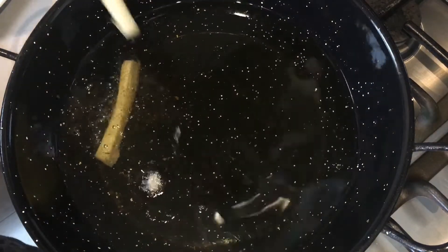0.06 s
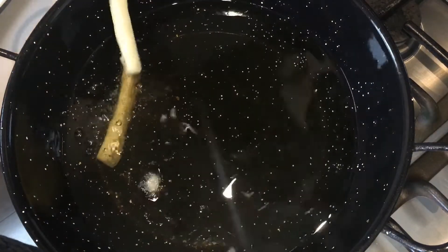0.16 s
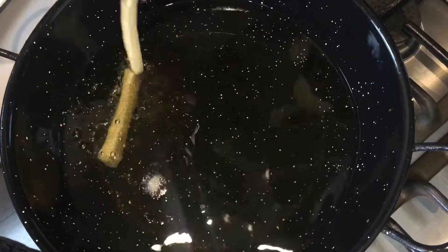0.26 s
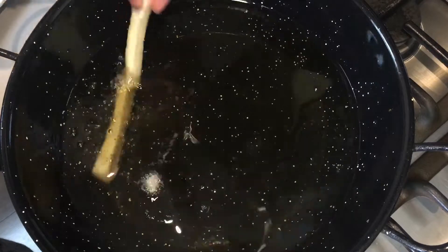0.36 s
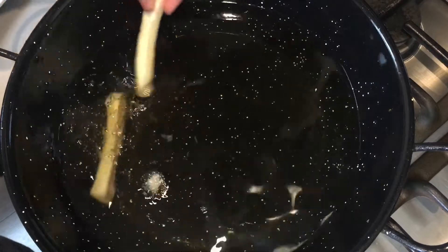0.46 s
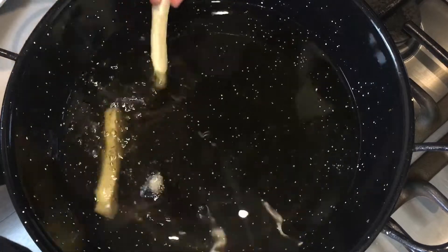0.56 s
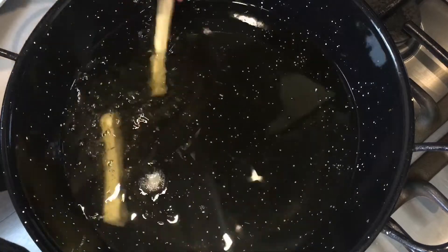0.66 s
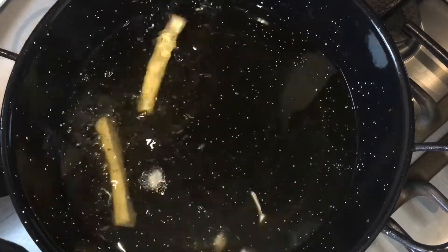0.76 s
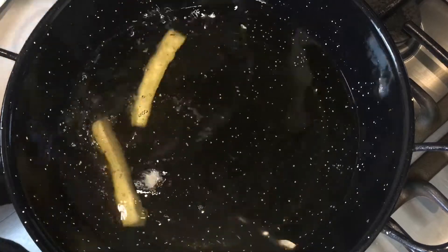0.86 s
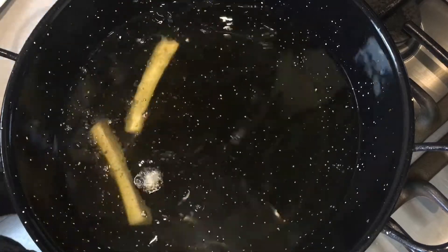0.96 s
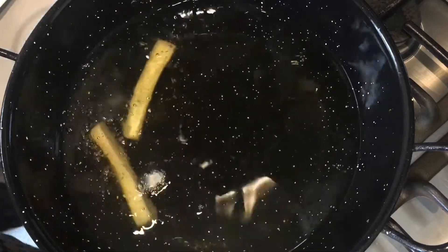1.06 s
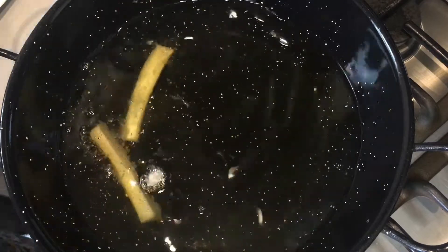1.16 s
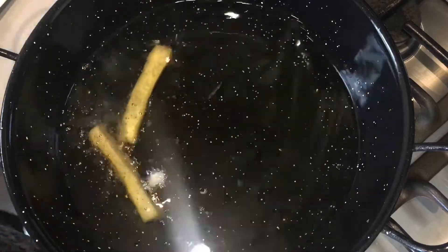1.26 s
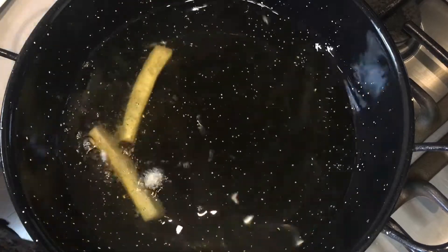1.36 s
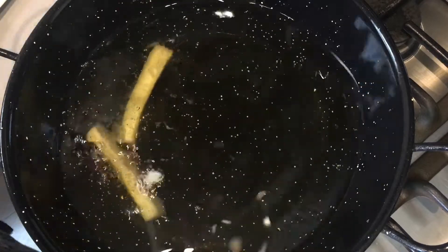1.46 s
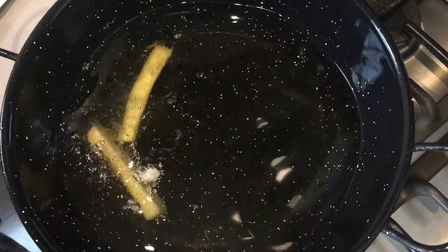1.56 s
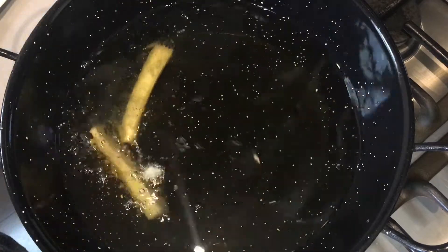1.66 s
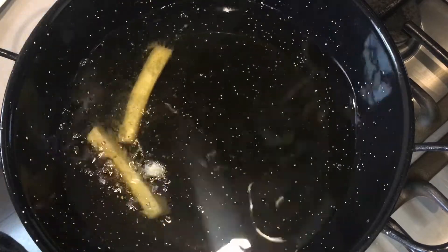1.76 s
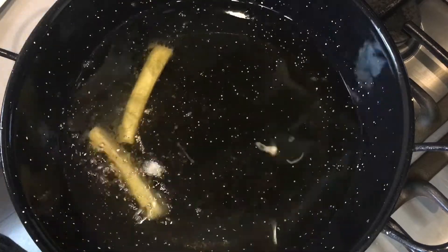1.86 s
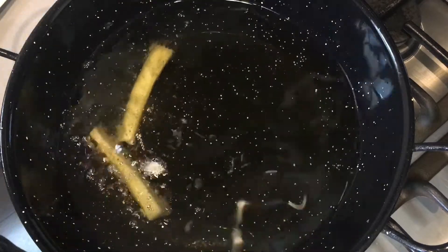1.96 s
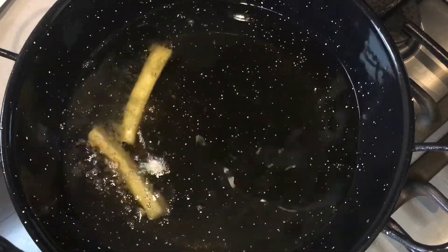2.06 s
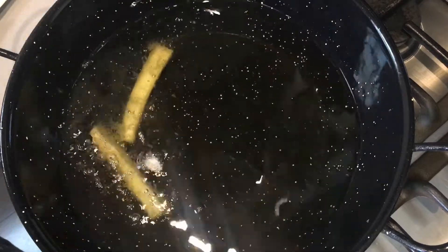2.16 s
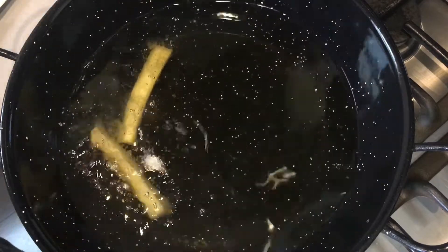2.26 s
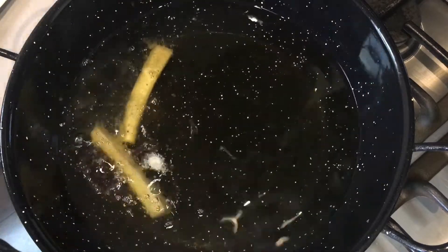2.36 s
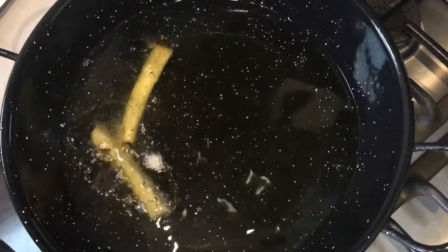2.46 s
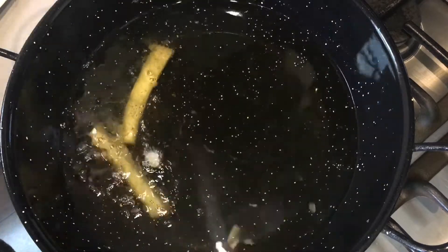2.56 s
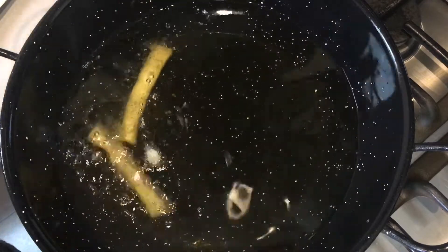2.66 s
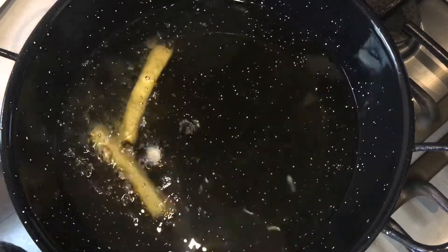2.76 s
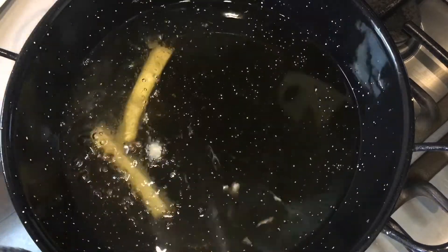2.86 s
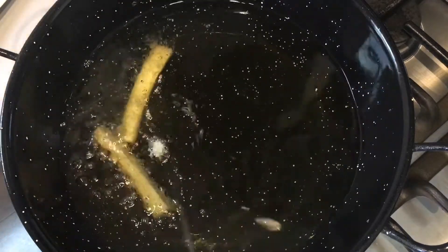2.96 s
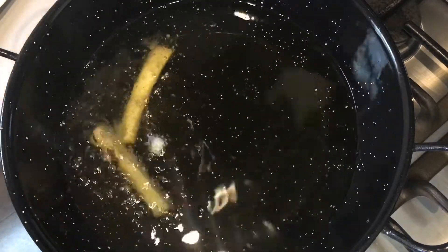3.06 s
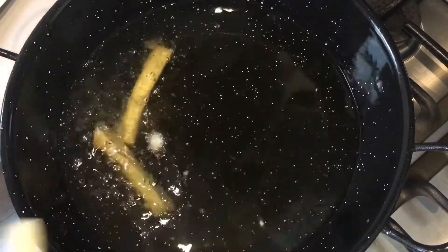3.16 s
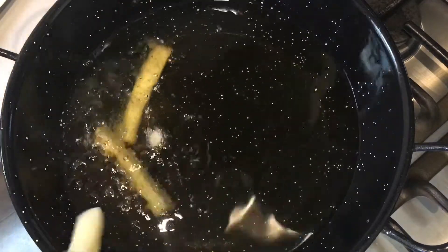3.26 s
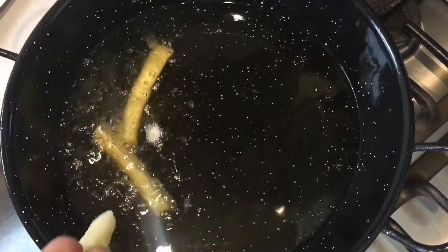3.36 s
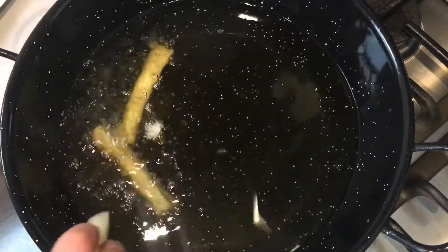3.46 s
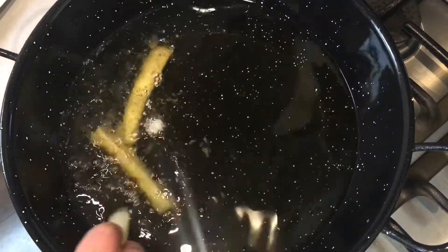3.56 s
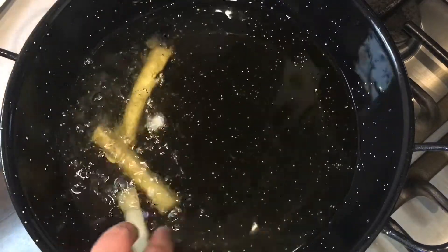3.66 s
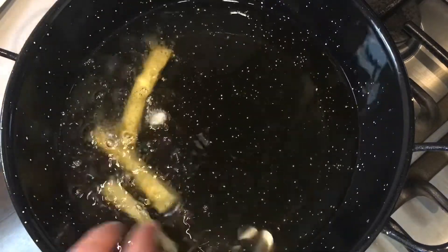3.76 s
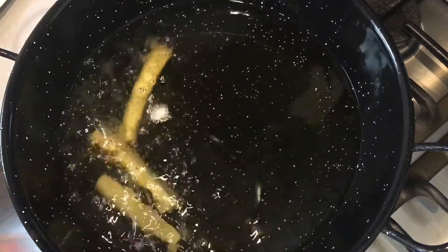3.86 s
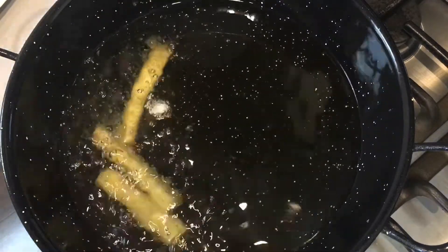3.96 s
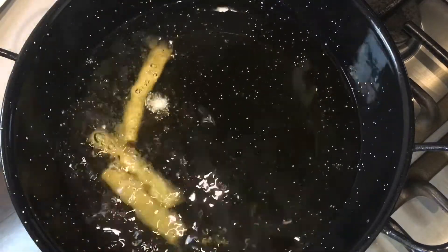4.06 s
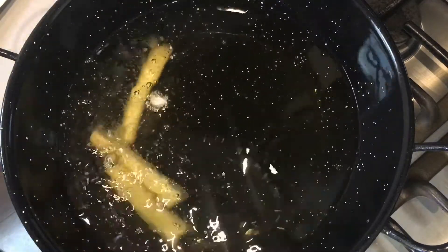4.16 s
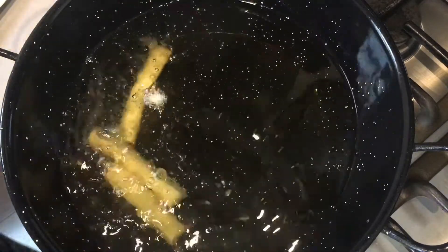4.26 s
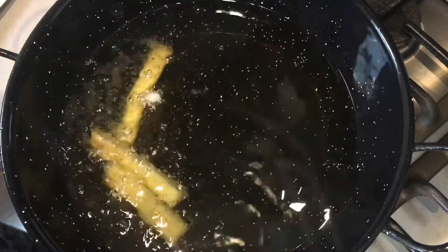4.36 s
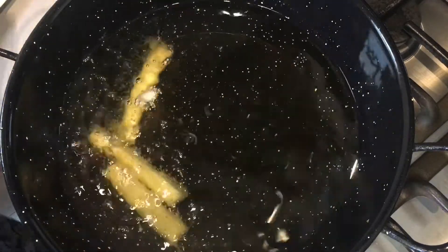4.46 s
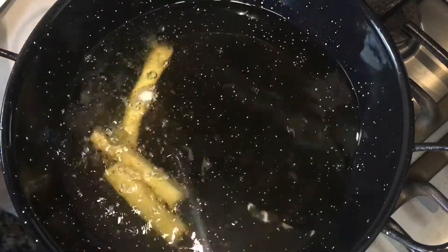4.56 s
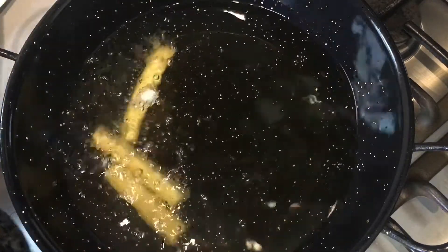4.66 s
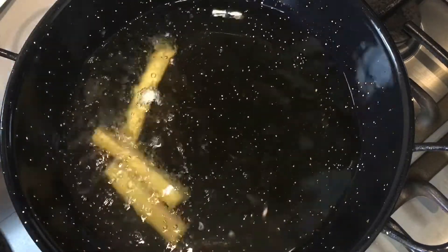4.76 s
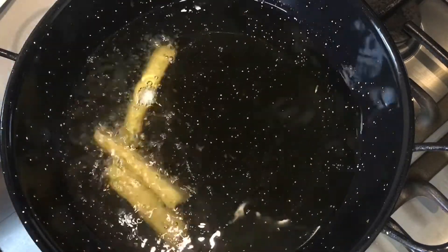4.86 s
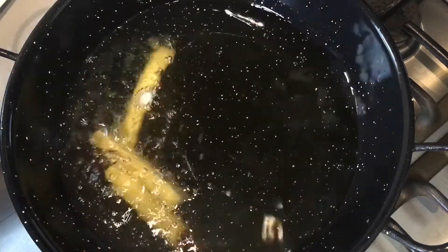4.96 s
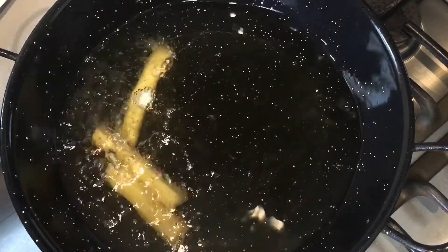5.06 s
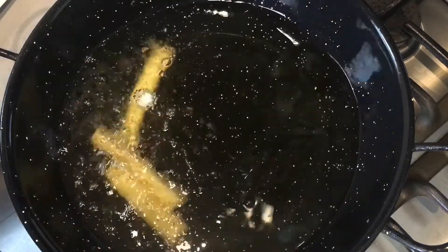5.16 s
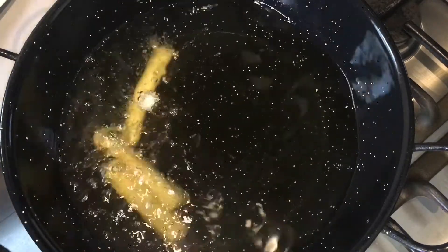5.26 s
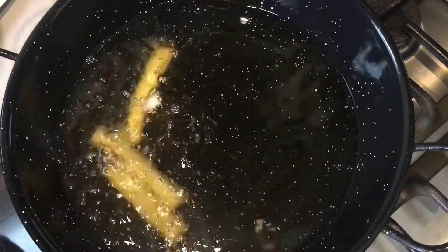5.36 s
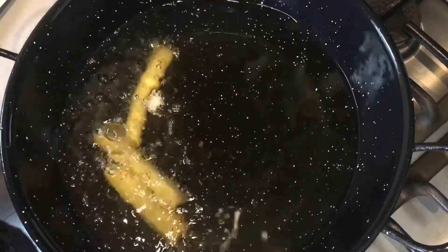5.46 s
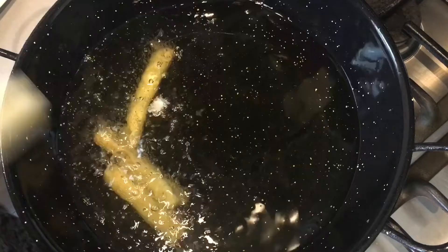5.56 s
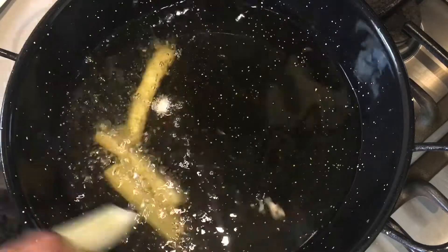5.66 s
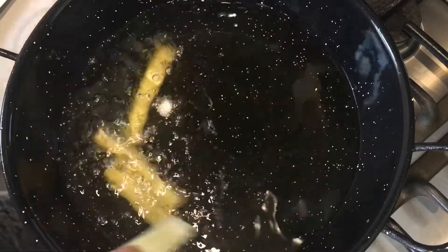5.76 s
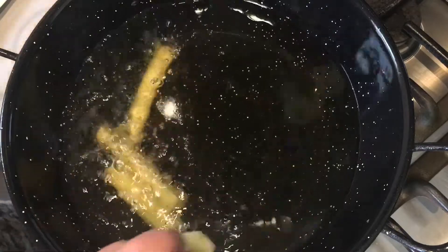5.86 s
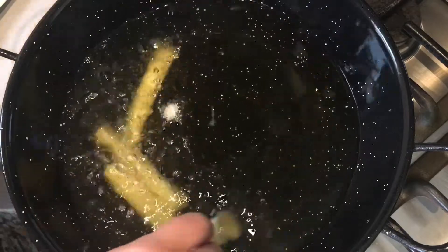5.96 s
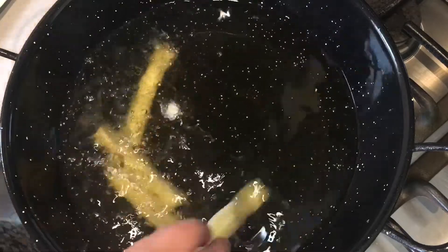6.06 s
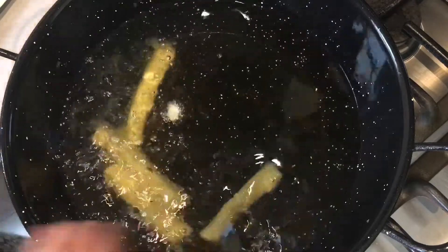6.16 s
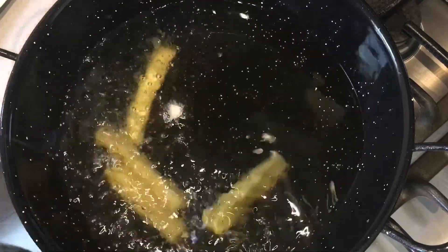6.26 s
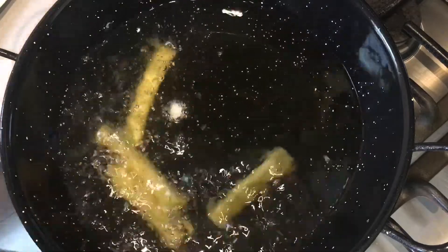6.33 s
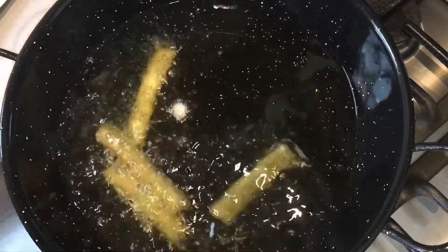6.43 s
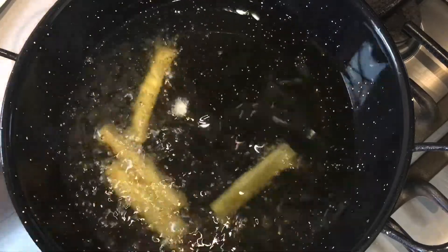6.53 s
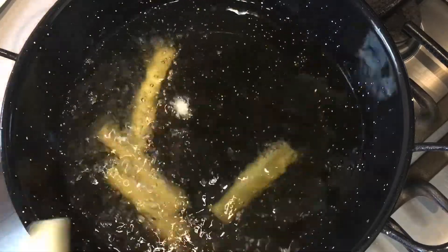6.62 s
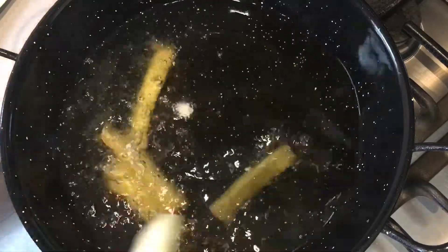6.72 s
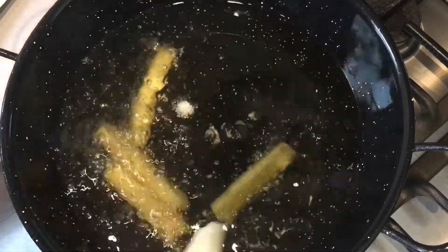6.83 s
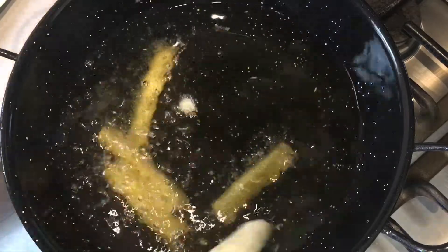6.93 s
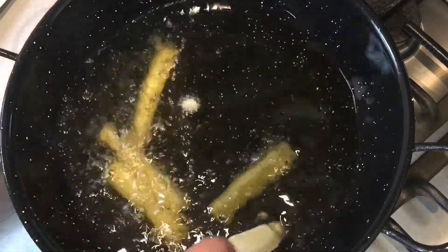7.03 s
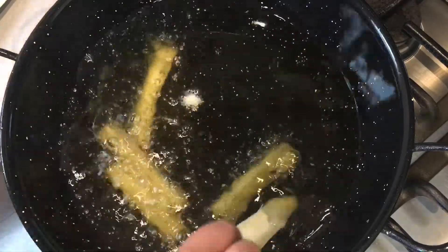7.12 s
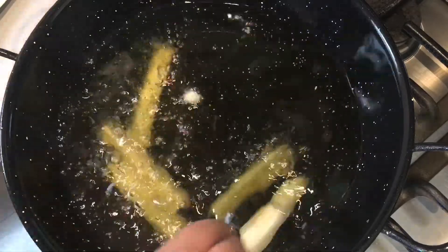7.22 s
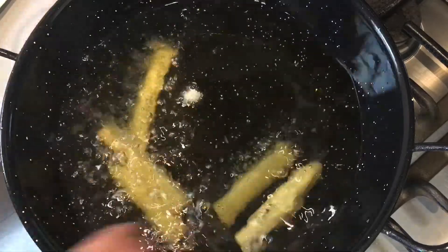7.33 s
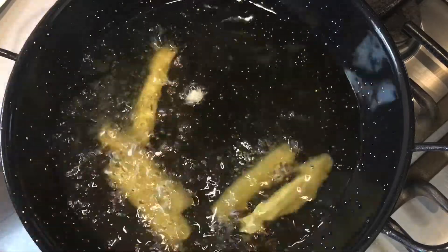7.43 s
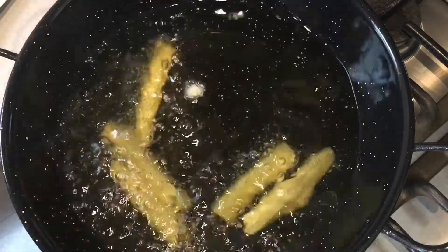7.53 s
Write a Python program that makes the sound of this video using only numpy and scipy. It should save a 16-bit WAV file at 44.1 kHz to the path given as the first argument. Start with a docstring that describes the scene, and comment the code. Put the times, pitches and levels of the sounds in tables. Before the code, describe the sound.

A close, mono kitchen sound: an enamelled pan of hot oil on a gas ring. Throughout, the burner hisses steadily with a slight flutter, over a low mains hum and deep drone. At first there is almost only this, with small ticks from 0.4 s. At 0.8 s a chip enters with a sharp pop and short fizz, repeated lightly at 1.0 s. A thin simmer follows with sparse crackles and a soft gulp near 2.3 s. At 3.8 s another wet chip sets off a bright, dense spitting flare, fading by 4.2 s to faint simmering and occasional ticks. At 6.05 s the loudest frying begins: splashy sizzle, bubbling plops and hard pops rattling around the pan, strongest around 6.45, 6.7 and 7.0 s. At 7.2 s one more chip renews the sizzle, still crackling at the end, 7.6 s.

```python
"""A kitchen, close over an enamelled pan on a gas ring: potato chips go one by one into hot oil, in mono.
Water on each wet chip flashes to steam, heard as swarms of tiny bubbles: clicks ringing in narrow bands.
Bigger drops pop and rattle round the pan, large bubbles plop and the oil gulps: shaped bursts of noise.
The burner hisses steadily underneath as noise through resonances; an appliance hums on two sines and a drone."""
import sys
import numpy as np
from scipy import signal
from scipy.fft import rfft, irfft, next_fast_len
from scipy.io import wavfile
from scipy.ndimage import uniform_filter1d

SR = 44100
rng = np.random.default_rng(int(sys.argv[2]) if len(sys.argv) > 2 else 0)


def dump_mix(stems):
    """Bounce the given channels to the path in sys.argv[1] as a 16-bit WAV at rate SR."""
    frames = np.atleast_2d(stems).T  # one column per channel
    limited = np.clip(frames, -1, 1)  # hard clip at full scale
    pcm = np.round(limited * 32767).astype(np.int16)
    wavfile.write(sys.argv[1], SR, pcm)


N = 334719
TIME = np.arange(N) / SR

# resonances of the gas jet, burner and the gap under the pan: f/Hz, half width/Hz, relative level/dB
BURNER_RESONANCES = [(190, 50, -34), (274, 310, -10), (721, 102, -1.5), (891, 86, 1), (1115, 59, 0),
                     (1396, 116, -3), (1853, 30, -13.5), (2197, 120, -6), (2730, 580, -17.5),
                     (3200, 186, -8), (3850, 184, -6.5), (4590, 216, -8), (5500, 620, -13),
                     (5997, 110, 0.6), (6590, 270, -10.5), (8050, 137, -6), (8980, 400, -15),
                     (10700, 1380, -12.5), (11550, 200, -14), (12750, 410, -16.5), (13840, 1030, -12.5),
                     (15630, 270, -42)]
# mains hum: f/Hz, rms level/dB
MAINS_HUM = [(100, -45.5), (200, -73.5)]
# low drone of the room: f/Hz, half width/Hz, relative level/dB
DRONE_RESONANCES = [(45, 9, -21), (57, 4, -15), (65.5, 3, 0), (75, 10, -14), (92, 7, -4.5), (124, 20, -16)]
# sizzle of the chips already in the pan: t/s, level/dB
SIMMER_LEVEL = [(0, -85), (0.5, -56), (0.8, -51), (1.3, -51.5), (1.75, -54.5), (2.05, -50), (2.35, -54),
                (4.2, -54.5), (4.9, -59), (6.0, -53), (6.9, -43.5), (7.59, -47)]
# a wet face of a chip meets the oil (some slide in by stages), levels before any sag:
# t/s, wet time/s, sizzle level/dB, spray level/dB, boil level/dB
CHIP_DIPS = [(0.8, 0.18, -50.5, -47, -69.5), (1.01, 0.077, -45.5, -51.5, -78),
             (3.8, 0.19, -41, -43.5, -55.5), (6.055, 0.12, -39.5, -36, -49.5),
             (6.24, 0.044, -44, -37.5, -54), (6.325, 0.34, -35.5, -44.5, -41.5),
             (7.21, 0.51, -47, -43.5, -59)]
# resonances of the oil-filled pan: f/Hz, half width/Hz, relative level/dB
PAN_RESONANCES = [(3246, 190, -0.5), (3900, 90, -4), (4590, 110, 1), (5100, 420, -9), (5440, 1870, -5.5),
                  (6010, 740, -4), (6580, 260, -2.5), (8940, 910, -26), (9180, 760, -8.5),
                  (12200, 1200, -12), (12900, 7400, -17.5)]
# colour of the large bubbles: f/Hz, relative level/dB
LARGE_BUBBLE_COLOUR = [(120, -27), (205, -8), (285, 4), (380, -2.5), (500, -6), (620, -3.5), (900, 1.5),
                       (1300, -2), (1850, -1.5), (2450, -0.5), (2900, -1.5), (3900, -36.5)]
# the loudest bursting drops: t/s, level/dB, f/Hz, spread of pitch/octaves
DROP_POPS = [(0.421, -42, 5200, 0.76), (0.5254, -48, 6500, 0.25), (0.6774, -45, 6000, 0.65),
             (0.7094, -45.5, 6760, 0.17), (0.834, -27.5, 6400, 0.31), (0.9088, -41, 6080, 0.23),
             (1.0208, -40.5, 6000, 0.39), (1.8175, -44, 3260, 0.19), (1.9071, -38.5, 12500, 0.22),
             (2.0095, -46.5, 4800, 0.35), (2.409, -42, 14500, 0.15), (3.3863, -43.5, 3080, 0.27),
             (3.8062, -38, 8800, 0.23), (3.8197, -34, 13000, 0.45), (3.8334, -35.5, 4600, 0.52),
             (3.853, -34, 14500, 0.34), (3.8882, -34, 6330, 0.19), (3.93, -37.5, 6900, 0.28),
             (3.943, -33.5, 7900, 0.15), (3.963, -36, 6290, 0.2), (3.9814, -32.5, 10000, 0.39),
             (4.0367, -37.5, 9700, 0.34), (4.0906, -44, 3840, 0.38), (4.1121, -39, 11900, 0.097),
             (4.2213, -45, 11500, 0.15), (4.372, -46.5, 3800, 0.35), (4.4883, -46.5, 4590, 0.19),
             (4.6287, -36.5, 9150, 0.29), (5.5465, -43, 12600, 0.27), (6.0554, -29.5, 3770, 0.53),
             (6.0845, -28.5, 6600, 0.38), (6.107, -27.5, 4600, 0.35), (6.1179, -28.5, 4570, 0.52),
             (6.1435, -29.5, 6700, 0.24), (6.1904, -30.5, 8700, 0.38), (6.2441, -32.5, 3260, 0.52),
             (6.3588, -31, 7350, 0.39), (6.4154, -32.5, 5030, 0.36), (6.452, -24.5, 4400, 0.38),
             (6.557, -31.5, 5400, 0.23), (6.607, -41, 11900, 0.12), (6.7032, -37, 9790, 0.29),
             (6.7275, -21, 4430, 0.17), (6.801, -29.5, 4320, 0.14), (6.86, -28, 4480, 0.39),
             (6.9486, -38.5, 4200, 0.31), (7.032, -23.5, 3260, 0.21), (7.1417, -38.5, 11700, 0.17),
             (7.2007, -35, 4570, 0.16), (7.358, -32.5, 5160, 0.42), (7.4993, -32, 6850, 0.71),
             (7.5123, -28, 4800, 0.22), (7.5784, -34, 4660, 0.47)]
# soft low gulps of the moving oil: t/s, level/dB, f/Hz, spread of pitch/octaves
OIL_GULPS = [(0.744, -53, 312, 0.37), (2.329, -57, 240, 0.28), (4.426, -54.5, 247, 0.2),
             (6.794, -53, 332, 0.23)]
# large bubbles breaking the surface: t/s, level/dB, f/Hz, spread of pitch/octaves
BUBBLE_PLOPS = [(3.389, -48, 870, 0.74), (3.848, -46, 2250, 0.44), (4.282, -50, 1500, 0.67),
                (6.119, -31.5, 2500, 0.42), (6.251, -37, 1150, 0.51), (6.486, -40, 1010, 0.77),
                (6.545, -42.5, 1280, 0.6), (6.791, -39, 2280, 0.76), (7.237, -43, 1820, 0.21),
                (7.404, -38, 1200, 0.77)]

BURNER_DB, DRONE_DB = -47, -50.7
SIMMER_SPRAY_DB = -10  # relative to the simmering sizzle
RESTING_BOIL_DB = -58.5
# small bubbles per second at a reference sizzle level; exponent by which their rate follows the sizzle gain
BUBBLES_PER_S, BUBBLES_AT_DB, RATE_FOLLOWS = 1000, -43.5, 0.15
CRACKLES_PER_S, CRACKLE_DB = 150, -8.5  # stray small pops; level relative to the sizzle
POP_T60_S, PLOP_T60_S, GULP_T60_S = 0.077, 0.082, 0.24
KITCHEN_T60_S, KITCHEN_DB = 0.43, -9.5  # echo level relative to the pan
CUTOFF_HZ = 15850


def from_db(db):
    """Decibels to gain."""
    return 10 ** (np.asarray(db) / 20)


def rms_one(x):
    """Scale to unit rms."""
    return x / np.sqrt(np.mean(x ** 2) + 1e-20)


def drift(rate):
    """Random wander: straight lines between unit-spread chance values, `rate` of them a second."""
    knots = rng.standard_normal(4096)
    return np.interp(TIME * rate, np.arange(len(knots)), knots)


def resonances(modes, hz):
    """Gain at each frequency of a set of resonances whose powers add."""
    power = 0
    for centre, half_width, db in modes:
        gain = from_db(db) / (1 + ((hz - centre) / half_width) ** 2)
        power = power + gain ** 2
    return np.sqrt(power)


def response(gain_at, size=2048):
    """Causal (minimum-phase) impulse response of a gain curve, with unit energy."""
    gain = gain_at(np.maximum(np.fft.rfftfreq(size, 1 / SR), 1))
    cepstrum = irfft(np.log(gain / gain.max() + 1e-5))
    # folding the cepstrum forward puts all the sound after the strike
    cepstrum[1:size // 2] *= 2
    cepstrum[size // 2 + 1:] = 0
    h = irfft(np.exp(rfft(cepstrum)))
    return h / np.linalg.norm(h)


def through(x, h):
    """Pass a sound through an impulse response."""
    return signal.oaconvolve(x, h)[:len(x)]


def reflections(t60, size=16384):
    """Dense echoes dying away by 60 dB in t60 seconds, with unit energy."""
    decay_db = -60 * np.arange(size) / SR / max(t60, .005)
    h = rng.standard_normal(size) * from_db(decay_db)
    return h / np.linalg.norm(h)


def steady_noise(modes):
    """Turbulence heard through fixed resonances; rms 1."""
    size = next_fast_len(N)
    gain = resonances(modes, np.fft.rfftfreq(size, 1 / SR))
    spectrum = rfft(rng.standard_normal(size)) * gain
    return rms_one(irfft(spectrum, size)[:N])


def burner():
    """The gas flame rushes as resonant turbulence with a slight flutter in level."""
    return from_db(BURNER_DB + 0.36 * drift(9)) * steady_noise(BURNER_RESONANCES)


def appliance():
    """Mains hum as steady sines, over a low drone of narrow-band noise."""
    hum = np.zeros(N)
    for hz, db in MAINS_HUM:
        sine = np.sin(2 * np.pi * (hz * TIME + rng.random()))
        hum += np.sqrt(2) * from_db(db) * sine  # root two turns rms into peak
    return hum + from_db(DRONE_DB) * steady_noise(DRONE_RESONANCES)


def pan_colour(hz):
    """Gain of the pan's resonances at each frequency."""
    return resonances(PAN_RESONANCES, hz)


def surface_colour(hz):
    """Small bubbles at the surface ring the pan only lightly, so its peaks are flattened."""
    return pan_colour(hz) ** 0.75


def boil_colour(hz):
    """Gain of the large bubbles at each frequency, joined smoothly in pitch."""
    f, db = np.transpose(LARGE_BUBBLE_COLOUR)
    return from_db(np.interp(np.log(hz), np.log(f), db))


def bell(hz, pitch, octaves):
    """The band in which a bubble of a given pitch sounds; at half gain it is `octaves` off centre."""
    return 1 / (1 + (np.log2(hz / pitch) / octaves) ** 2)


def bursts(per_s, spread_db):
    """Clicks of either sign at random moments: many small, a few large."""
    sizes = from_db(spread_db * np.minimum(rng.exponential(1, N), 4))
    happens = rng.random(N) < per_s / SR
    return happens * sizes * rng.choice([-1, 1], N)


def bubbles(colour, low_hz, high_hz, per_s, spread_db, octaves, t60, echo_db, count=14):
    """A swarm of bursting bubbles of many pitches, each echoing between the pan walls; rms 1."""
    clicks = bursts(per_s, spread_db) / np.sqrt(per_s)  # a faster rate adds no power
    dealt = rng.integers(0, count, N)  # which pitch each click gets
    out = np.zeros(N)
    for k, pitch in enumerate(np.geomspace(low_hz, high_hz, count)):
        gain_at = lambda hz: colour(hz) * bell(hz, pitch, octaves)
        strength = np.linalg.norm(gain_at(np.arange(1, SR // 2, 20)))
        walls = from_db(echo_db) * reflections(t60, size=4096)
        walls[0] += 1  # the direct sound
        ring = through(walls, response(gain_at))
        out += strength * through(clicks * (dealt == k), ring)
    return rms_one(out)


def flash(column, delay_s, attack_s, sag_db_per_s, release_db_per_s):
    """Gain of one bubble size: swells at each dip, sags while the chip is wet, then dies away; powers add."""
    power = np.zeros(N)
    for s, wet, *levels_db in CHIP_DIPS:
        age = np.maximum(TIME - s - delay_s, 0)
        swell = np.minimum(age / attack_s, 1)
        fall_db = sag_db_per_s * np.minimum(age, wet) + release_db_per_s * np.maximum(age - wet, 0)
        power += (swell * from_db(levels_db[column] - fall_db)) ** 2
    return np.sqrt(power)


def frying():
    """Three sizes of steam bubble flare over the simmer; harder frying brings small ones faster, with crackles."""
    simmer_db = np.interp(TIME, *np.transpose(SIMMER_LEVEL))
    sizzle_flash = flash(0, delay_s=0.005, attack_s=0.035, sag_db_per_s=7, release_db_per_s=70)
    spray_flash = flash(1, delay_s=0.005, attack_s=0.025, sag_db_per_s=22, release_db_per_s=95)
    boil_flash = flash(2, delay_s=0.06, attack_s=0.08, sag_db_per_s=7, release_db_per_s=9)
    sizzle_gain = np.hypot(sizzle_flash, from_db(simmer_db))
    spray_gain = np.hypot(spray_flash, from_db(simmer_db + SIMMER_SPRAY_DB))
    boil_gain = np.hypot(boil_flash, from_db(RESTING_BOIL_DB))

    per_s = BUBBLES_PER_S * (sizzle_gain / from_db(BUBBLES_AT_DB)) ** RATE_FOLLOWS
    sizzle = bubbles(surface_colour, 3150, 6800, per_s, spread_db=4.6, octaves=0.21, t60=0.062, echo_db=7)
    spray = bubbles(surface_colour, 7380, 17000, per_s, spread_db=5.3, octaves=0.18, t60=0.039, echo_db=2)
    boil = bubbles(boil_colour, 204.6, 2500, 1400, spread_db=3.0, octaves=0.26, t60=0.076, echo_db=4)
    crackle = bubbles(surface_colour, 3230, 13600, CRACKLES_PER_S, spread_db=1.0, octaves=0.063,
                      t60=0.083, echo_db=10, count=10)
    fine = sizzle_gain * (sizzle + from_db(CRACKLE_DB) * crackle)
    return fine + spray_gain * spray + boil_gain * boil


def pops(rows, colour, t60, crack_db, crack_t60, splash_db, swell_cycles, size=8192):
    """Each burst has its own pitch, a brief crack and a faint broad splash, then rattles round the pan."""
    out = np.zeros(N + size)
    colour_peak = colour(np.geomspace(200, 16000, 200)).max()
    for s, level_db, pitch, octaves in rows:
        burst = from_db(crack_db) * reflections(crack_t60, size=size) + reflections(t60, size=size)
        burst *= 1 - np.exp(-TIME[:size] * pitch / swell_cycles)  # larger bubbles take longer to open
        splash = from_db(splash_db) * colour(pitch) / colour_peak
        pop = through(burst, response(lambda hz: colour(hz) * (bell(hz, pitch, octaves) + splash)))
        # the level is the rms of the loudest 10 ms
        loudest_rms = np.sqrt(uniform_filter1d(pop ** 2, SR // 100, mode="constant").max())
        at = int(s * SR)
        out[at:at + size] += from_db(level_db) * pop / loudest_rms
    return out[:N]


def drop_pops():
    """Bigger water drops burst into steam and ring the pan."""
    return pops(DROP_POPS, pan_colour, t60=POP_T60_S, crack_db=-7.5, crack_t60=0.02,
                splash_db=-13, swell_cycles=5.7)


def oil_gulps():
    """Moving oil gulps softly: low, slow-opening bursts with long tails."""
    return pops(OIL_GULPS, boil_colour, t60=GULP_T60_S, crack_db=-20, crack_t60=0.05,
                splash_db=-39, swell_cycles=3.6)


def bubble_plops():
    """Large bubbles break the surface with a short crack and a lower ring."""
    return pops(BUBBLE_PLOPS, boil_colour, t60=PLOP_T60_S, crack_db=-4, crack_t60=0.012,
                splash_db=-20, swell_cycles=2.0)


def scene():
    """The pan with a little kitchen echo, over burner and hum; the same in both channels."""
    pan = frying() + drop_pops() + oil_gulps() + bubble_plops()
    kitchen = from_db(KITCHEN_DB) * through(pan, reflections(KITCHEN_T60_S))
    return np.tile(pan + kitchen + burner() + appliance(), (2, 1))


def record(dry):
    """The top is cut steeply by a low-pass filter."""
    low_pass = signal.ellip(12, .1, 80, CUTOFF_HZ, fs=SR, output="sos")
    return signal.sosfilt(low_pass, dry)


dry = scene()
out = record(dry)
dump_mix(out)
```